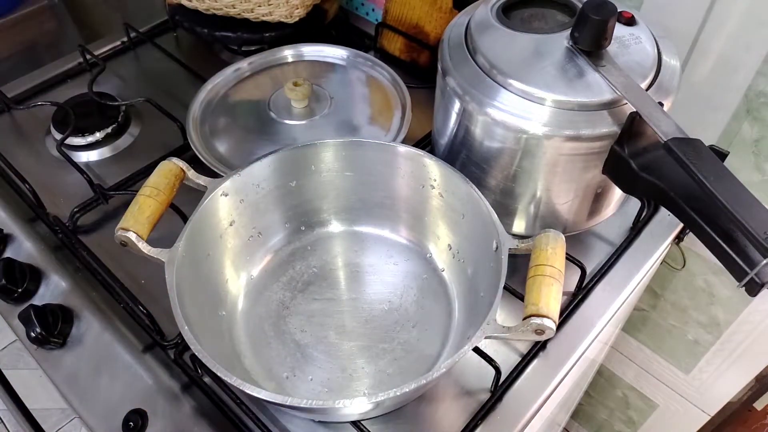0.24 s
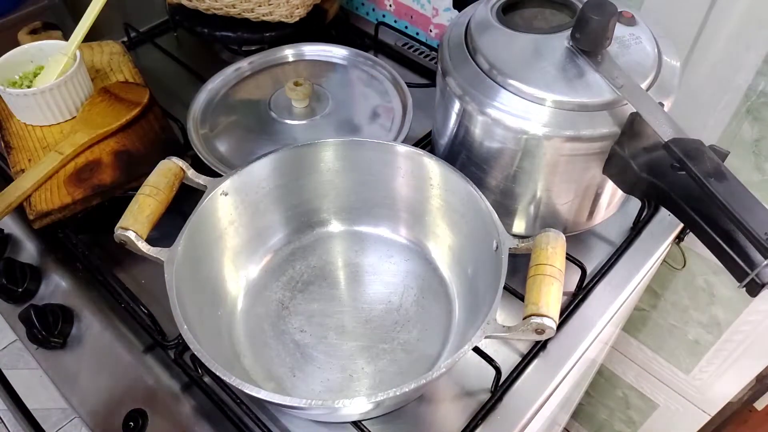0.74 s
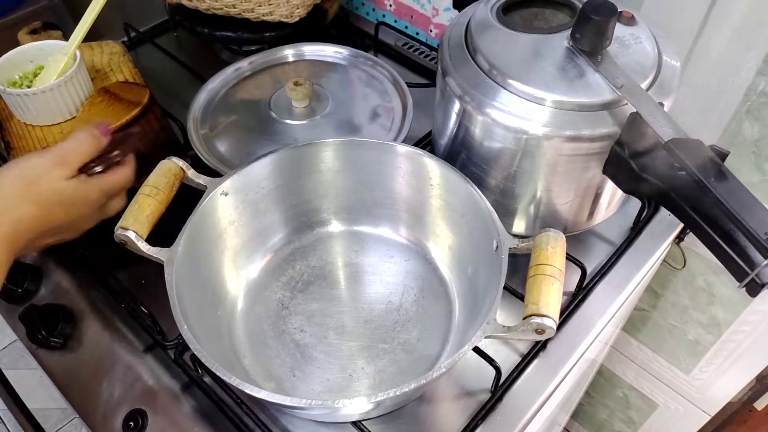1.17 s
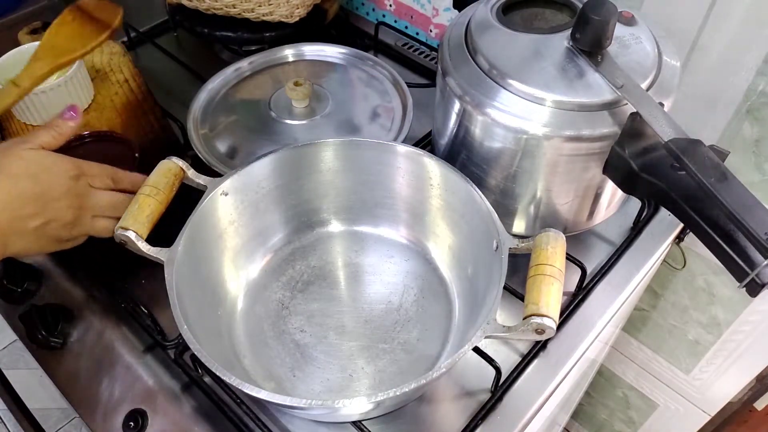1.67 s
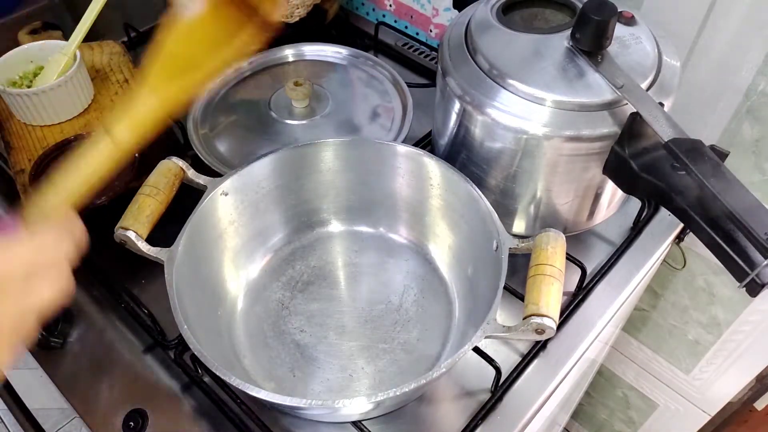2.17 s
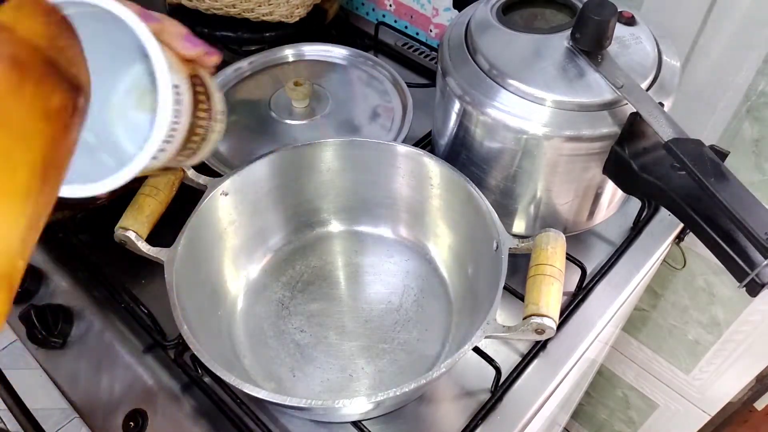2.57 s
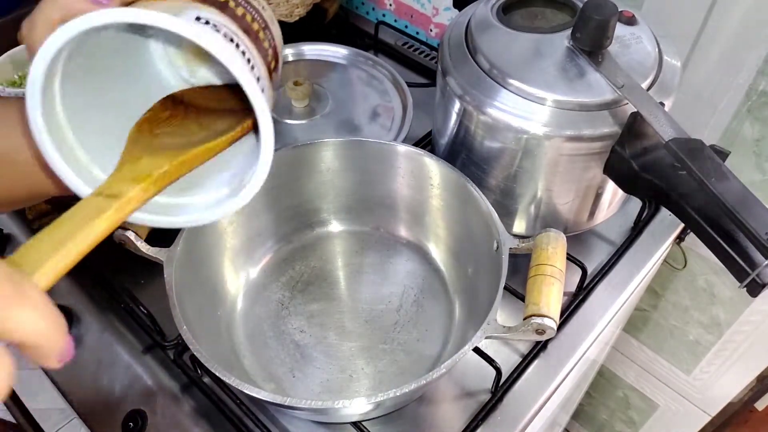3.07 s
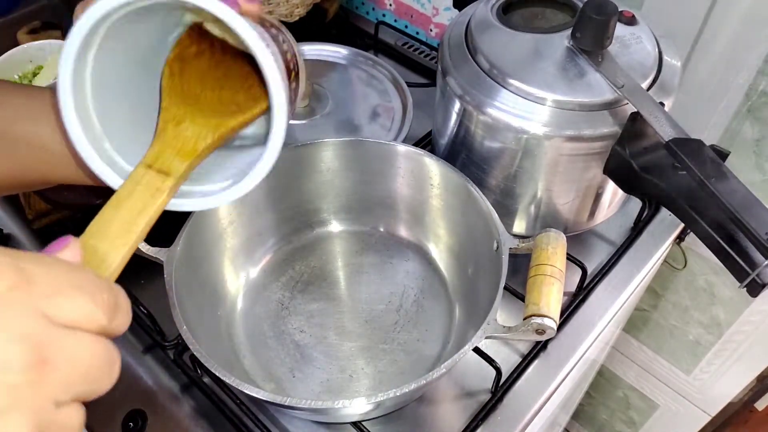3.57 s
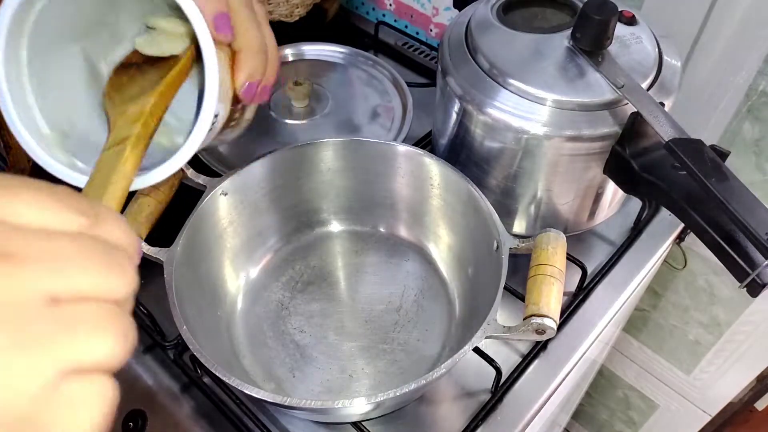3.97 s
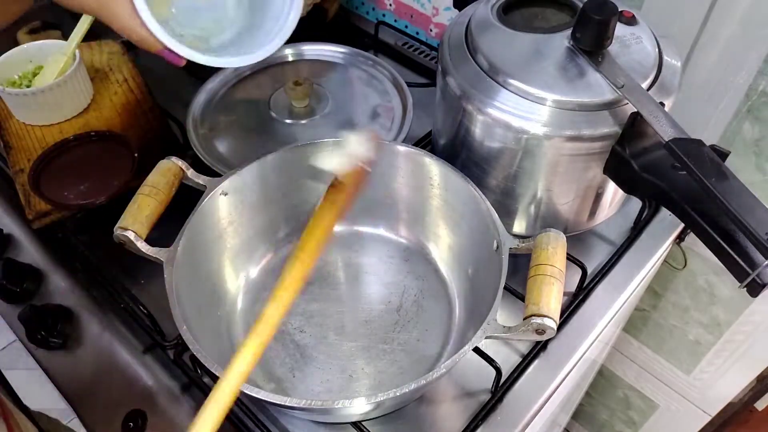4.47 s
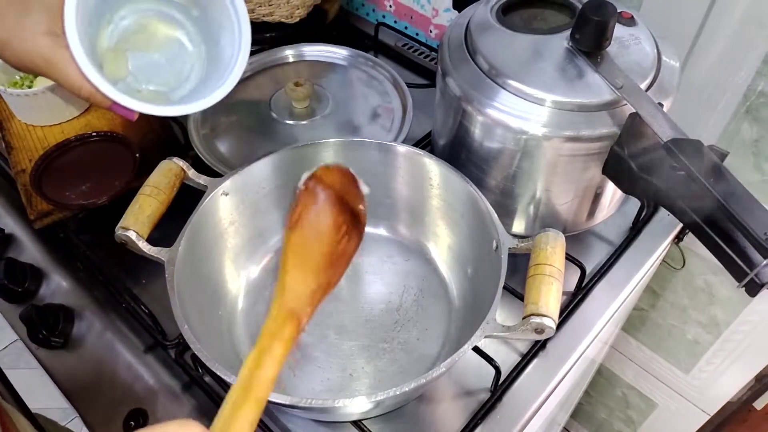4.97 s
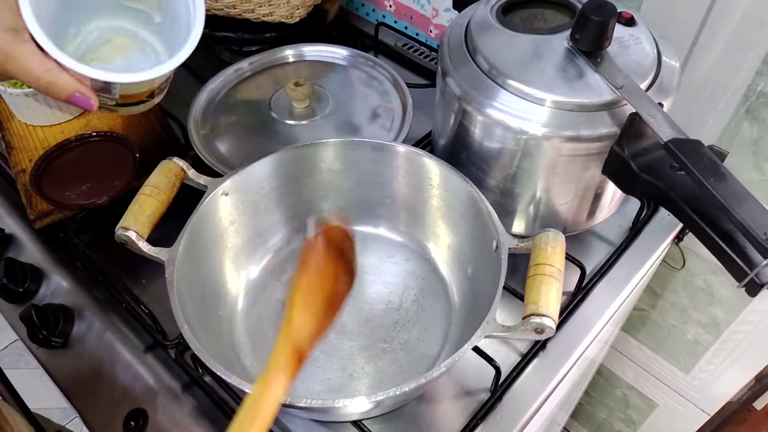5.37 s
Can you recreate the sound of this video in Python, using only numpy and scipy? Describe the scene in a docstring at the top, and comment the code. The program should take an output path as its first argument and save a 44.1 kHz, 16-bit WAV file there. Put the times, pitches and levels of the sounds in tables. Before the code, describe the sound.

From 0 to 0.6 s a pressure cooker vents close by: loud, bright, sputtering steam with breathy half-whistles. It cuts abruptly to complete silence until about 0.92 s. The steam then returns much softer and farther off, continuing to the end at 5.7 s, gently wavering, with thin airy whistles and small spurts after 4.3 s. A light wooden bump marks the return; more contacts chatter on a board around 1.45-2.0 s, strongest near 1.6, with a brief dish clink at 1.8. A wooden spoon knocks hollowly in a plastic tub from 2.9 to 3.2 s, with a rough rub, then again near 3.5 and duller at 3.75-3.8, with soft low handling rumble. A quick scrape and cluster of small knocks comes at 4.3-4.4 s. The small hard kitchen answers the knocks briefly; low hum lies underneath, with a faint gliding drone between about 0.9 and 4.2 s.

```python
"""A pressure cooker vents steam close by (filtered, sputtering noise with half-whistles); 0.3 s of silence, and
the scene changes. Then it vents farther off, while things are shifted on a wooden board (struck modes) and a
dish clinks. A wooden spoon knocks and rubs in a plastic tub as it scoops out a dollop (decaying rings, rough
noise). A small hard-walled kitchen answers the knocks; a low hum lies under both parts, and a faint gliding
drone comes and goes under the second."""
import sys
import numpy as np
from scipy import signal
from scipy.fft import rfft, irfft, next_fast_len
from scipy.io import wavfile
from scipy.ndimage import uniform_filter1d, minimum_filter1d, map_coordinates

SR = 44100
rng = np.random.default_rng(int(sys.argv[2]) if len(sys.argv) > 2 else 0)


def materialize(psi):
    """Save the field psi as 16-bit PCM at rate SR to the path in sys.argv[1].

    A 1-D psi becomes a single channel; in a 2-D psi each row is a channel.
    """
    bounded = np.clip(np.atleast_2d(psi).T, -1, 1)
    quanta = np.round(bounded * 32767).astype(np.int16)
    wavfile.write(sys.argv[1], SR, quanta)


N = 248265

LEFT_RIGHT = np.array([[1], [-1]])


def amp(db):
    """Decibels to gain."""
    return 10 ** (np.asarray(db) / 20)


def pan(left_minus_right_db):
    """Level offsets in dB of the two sides, half the difference each."""
    return left_minus_right_db * LEFT_RIGHT / 2


def unit(x):
    """Scale to rms 1."""
    return x / np.sqrt(np.mean(x ** 2) + 1e-20)


def steady(x):
    """Hold a noise at rms 1 from moment to moment."""
    power = np.abs(uniform_filter1d(np.mean(x ** 2, axis=0), size=4000))
    return x / np.sqrt(power + 1e-20)


def clock():
    """Time of each sample, s."""
    return np.arange(N) / SR


def along(points, hz):
    """Read (Hz, value) points on a log frequency axis."""
    f, v = np.transpose(points)
    return np.interp(np.log(hz + 1), np.log(f + 1), v)


def wobble(knots_per_s):
    """Smooth random curve through normal knots."""
    knots = rng.standard_normal(int(N * knots_per_s / SR) + 4)
    return map_coordinates(knots, [clock() * knots_per_s])


def arch(start_s, end_s):
    """Swell from nothing at start and fade to nothing at end."""
    progress = np.clip((clock() - start_s) / (end_s - start_s), 0, 1)
    return np.sqrt(np.abs(np.sin(np.pi * progress)))


def struck(age_s, t60_s):
    """Quick rise at age 0, then exponential decay."""
    t = np.maximum(age_s, 0)
    return (1 - np.exp(-t / 0.001)) * amp(-60 * t / t60_s)


def filtered(x, response):
    """Multiply the spectrum of x by a response of frequency."""
    m = next_fast_len(N + 8192)
    return irfft(rfft(x, m) * response(np.fft.rfftfreq(m, 1 / SR)), m)[..., :N]


def left_late(hz, delay_s):
    """Response of the two sides to a sound that reaches the left one later."""
    return np.exp(-2j * np.pi * hz * np.array([[delay_s], [0]]))


def pair(alike):
    """White stereo noise whose sides have the correlation alike."""
    mid, side = rng.standard_normal((2, N))
    turn = np.arccos(np.clip(alike, -1, 1)) / 2
    return np.cos(turn) * mid + np.sin(turn) * side * LEFT_RIGHT


def rippled(x, depth_db, width_hz, life_s, own):
    """Random peaks and troughs drift through the spectrum; own weights what differs between the sides."""
    hz, t, z = signal.stft(x, SR, nperseg=1536, noverlap=1152)
    grid = np.meshgrid(hz / width_hz, t / life_s, indexing="ij")
    shared, left, right = [unit(map_coordinates(knots, grid, order=1, mode="mirror"))
                           for knots in rng.standard_normal((3, 512, 256))]
    field = unit(shared + own * np.array([left, right]))
    field = np.minimum(field, 2.2)  # limit the highest peaks
    return signal.istft(z * amp(depth_db * field), SR, nperseg=1536, noverlap=1152)[1][:, :N]


def wash(centre_hz, octaves):
    """Rms-1 noise band, a resonance blurred by the room; the lower, the more alike the sides."""
    alike = along([(200, 1.0), (600, 0.55), (1000, 0.13)], centre_hz)
    return unit(filtered(pair(alike), lambda hz: 1 / (1 + (np.log2((hz + 1) / centre_hz) / octaves) ** 4)))


def part(index):
    """Gate of one part: 1 while it sounds, with a 1 ms start and a very quick fade."""
    # parts: start/s, end/s
    spans = [(-.01, .601), (.922, 5.7)]
    start_s, end_s = spans[index]
    fade_t60_s = 0.03
    return np.clip((clock() - start_s) * 1000, 0, 1) * amp(-60 * np.maximum(clock() - end_s, 0) / fade_t60_s)


def background():
    """Low room noise with a hum, a narrow noise band that wavers by itself."""
    # room noise spectrum: f/Hz, relative density/dB per Hz
    colour = [(12, -57.5), (20, -13.5), (70, -2.5), (98, -9.5), (124, 2), (157, -5.5), (183, -8),
              (206, -13.5), (247, -1), (370, -13), (562, -12.5), (622, -17.5), (1100, -12), (1430, -55),
              (2420, -120)]
    floor_db, hum_db = -60.5, -68
    floor = unit(filtered(pair(0.79), lambda hz: amp(along(colour, hz))))
    hum = unit(filtered(pair(1.0), lambda hz: 1 / (1 + ((hz - 129) / 7) ** 2)))
    return amp(floor_db) * floor + amp(hum_db) * hum


def drone():
    """Faint, unsteady tone and its octave slide in pitch, perhaps an engine outside."""
    # glides: start/s, end/s, first f/Hz, last f/Hz, fundamental/dB, octave/dB
    glides = [(0.92, 1.068, 108.8, 114.6, -66, -53), (1.06, 1.288, 123.1, 127.6, -62, -50),
              (1.634, 1.835, 136.3, 126, -47, -54), (1.948, 2.173, 121.5, 115.5, -51, -66),
              (3.078, 3.9, 133.4, 98.2, -51, -62), (3.99, 4.223, 93.5, 84.2, -58, -54)]
    waver_db, jitter_hz = 2, 2.5
    out = np.zeros(N)
    for start_s, end_s, first_hz, last_hz, low_db, octave_db in glides:
        hz = np.interp(clock(), [start_s, end_s], [first_hz, last_hz]) + jitter_hz * wobble(45)
        phase = 2 * np.pi * np.cumsum(hz) / SR
        for k, db in enumerate([low_db, octave_db]):
            level = amp(db + waver_db * wobble(24.82))
            out += arch(start_s, end_s) * level * np.sin((k + 1) * phase)
    return out


def kitchen(x, alike=0.073, build_s=0.0025):
    """Room answer: noise builds up after the first wall echo and dies, slowest in the bass."""
    # reverberation: f/Hz, t60/s
    reverb = [(120, 0.86), (300, 0.33), (700, 0.35), (2000, 0.12), (10000, 0.43)]
    wall_delay_s = 0.009
    hz, t, z = signal.stft(pair(alike)[:, :SR * 3 // 4], SR, nperseg=256)
    build = 1 - np.exp(-np.maximum(t - wall_delay_s, 0) / build_s)
    decay = amp(-60 * t / along(reverb, hz)[:, None]) * build
    tail = signal.istft(z * decay, SR, nperseg=256)[1]
    wet = signal.fftconvolve(x[None], tail / np.linalg.norm(tail[0]), axes=1)
    # long waves reach both sides alike
    highpass = signal.butter(2, 330, "highpass", fs=SR, output="sos")
    side = signal.sosfilt(highpass, (wet[0] - wet[1]) / 2)
    return wet.mean(axis=0) + side * LEFT_RIGHT


def rumble():
    """The hand turning the tub adds a soft, low noise band."""
    # turns: start/s, end/s, level/dB
    turns = [(3.694, 3.91, -50.5), (4.028, 4.26, -57.5)]
    level = sum(amp(db) * arch(start_s, end_s) ** 2 for start_s, end_s, db in turns)
    return level * wash(centre_hz=100, octaves=0.49)


def clink():
    """A dish is touched: one short, light ring with a weaker low mode."""
    start_s, t60_s, level_db = 1.808, 0.23, -41.5
    modes = wash(centre_hz=1940, octaves=0.047) + 0.6 * wash(centre_hz=1140, octaves=0.07)
    return amp(level_db) * struck(clock() - start_s, t60_s) * modes


def bumps():
    """Things chatter on the board: each contact rings the modes near its pitch, its weight the lowest."""
    # contacts: t/s, level/dB, pitch/Hz, weight (drive of the lowest mode)/dB, left minus right/dB
    contacts = [(0.922, -38, 510, 1.5, 2), (0.942, -59, 430, 6, 2), (1.456, -48.5, 635, -40, -2),
                (1.603, -44, 640, -12, 1), (1.618, -32.5, 1200, -12, 3), (1.637, -43, 900, -2, 1),
                (1.649, -44, 775, 0, 0), (1.683, -50, 800, 4, 3), (1.777, -62, 700, 18, 1),
                (1.807, -45.5, 570, -13, -1), (1.865, -48.5, 543, -1, 1), (2.021, -55, 810, -4, 3),
                (2.604, -52.5, 555, -14, 6), (4.1, -72, 500, 22.5, 4)]
    # board modes, lowest first: f/Hz, level/dB, blur/octaves, t60/s
    modes = [(223, -9, 0.32, 0.51), (370, 0.5, 0.23, 0.27), (540, -1.5, 0.22, 0.32), (800, -1, 0.41, 0.43),
             (1200, -0.5, 0.3, 0.24)]
    reach_octaves = 0.42  # how far from its pitch a contact still wakes modes
    direct_db, direct_cycles = 3, 13  # clean ring ahead of the room's wash; its t60 in cycles
    chatter_db = 1
    out, t = np.zeros((2, N)), np.arange(SR * 3 // 4) / SR
    for k, (hz, mode_db, octaves, t60_s) in enumerate(modes):
        blur = wash(hz, octaves)
        for s, db, pitch_hz, weight_db, pan_db in contacts:
            span = slice(round(s * SR), round(s * SR) + len(t))
            if k == 0:
                drive = amp(weight_db)
            else:
                drive = 1 / (1 + (np.log2(hz / pitch_hz) / reach_octaves) ** 4)
            detuned_hz = hz * (1 + 0.056 * rng.standard_normal())
            clean = np.sin(2 * np.pi * detuned_hz * t) * struck(t, direct_cycles / hz)
            ring = amp(direct_db) * clean + struck(t, t60_s) * blur[:, span]
            out[:, span] += amp(db + mode_db + pan(pan_db)) * drive * ring
    return out * amp(chatter_db * wobble(110))


def scrapes():
    """The rubbing spoon sticks and slips: rough noise coloured by the tub's hollow."""
    # strokes: start/s, end/s, level/dB
    strokes = [(2.897, 3.104, -48), (4.28, 4.342, -47), (4.345, 4.43, -52)]
    level = sum(amp(db) * arch(start_s, end_s) ** 2 for start_s, end_s, db in strokes)
    return level * amp(4.5 * wobble(140)) * wash(centre_hz=620, octaves=0.45)


def tub():
    """Each knock rings hollow and wall, thumps the base and ticks; each has its own freshly drawn room tail."""
    # spoon knocks: t/s, level/dB, ring f/Hz, ring t60/s, thump/dB, tick/dB, tick f/Hz
    knocks = [(2.925, -27.5, 680, .05, -9, -19, 1700), (2.973, -10, 643, 0.015, -29, -14, 1770),
              (2.979, -25.5, 740, 0.023, -20, -2, 1650), (2.993, -30, 480, 0.026, -17, -14, 1500),
              (3.016, -22.5, 600, 0.018, -25, -18, 1400), (3.056, -16, 743, 0.026, -35, -24, 1300),
              (3.197, -10, 706, 0.023, -10.5, -21.5, 1250), (3.493, -29, 726, 0.045, -29, -27, 1500),
              (3.536, -13.5, 685, 0.035, -16, -10, 1610), (3.754, -18.5, 535, 0.0085, -6.5, -23, 1310),
              (3.787, -18, 584, 0.012, -14.5, -24, 1500), (4.3, -32, 646, 0.031, -23, -28, 1500),
              (4.306, -33, 784, .03, -23, -28, 1500), (4.318, -30, 750, 0.027, -25, -30, 1500),
              (4.322, -21.5, 650, .024, -26, -26, 1500), (4.33, -32, 563, 0.017, -17, -22, 1500),
              (4.358, -39, 560, .03, -20, -24, 1500), (4.375, -41, 780, .03, -20, -22, 1500)]
    # wall modes: f/Hz, mean level/dB, t60/s
    wall_modes = [(400, -28, 0.037), (513, -14.5, 0.044), (842, -21, 0.055)]
    # wall tick: multiple of tick f, level/dB, t60/s
    tick_modes = [(.83, -11, 0.013), (1, 0.5, 0.02), (1.14, 0, .014), (1.9, 4, 0.013)]
    # room answer: left/dB, right/dB
    room_db = [-3.5, -6]
    direct, room, t = np.zeros(N + SR), np.zeros((2, N + 2 * SR)), np.arange(SR // 4) / SR
    woody = signal.butter(2, [700, 3600], "bandpass", fs=SR, output="sos")

    def ring(hz, t60_s, attack_s):
        return np.sin(2 * np.pi * hz * t) * amp(-60 * t / t60_s) * (1 - np.exp(-t / attack_s))

    for s, db, hz, t60_s, thump_db, tick_db, tick_hz in knocks:
        hollow = 1.4 * ring(hz, t60_s, attack_s=0.0014)
        wall = sum(amp(mode_db + 2 * rng.standard_normal()) * ring(mode_hz, mode_t60_s, attack_s=0.005)
                   for mode_hz, mode_db, mode_t60_s in wall_modes)
        thump = ring(hz=245, t60_s=0.035, attack_s=0.0064)
        thump += 0.45 * ring(hz=145, t60_s=0.088, attack_s=0.011)
        thump += 0.31 * ring(hz=478, t60_s=0.038, attack_s=0.0073)
        crack = signal.sosfilt(woody, rng.standard_normal(len(t)) * amp(-60 * t / 0.0018))
        tick = 1.2 * crack + sum(amp(mode_db) * ring(multiple * tick_hz, mode_t60_s, attack_s=0.00025)
                                 for multiple, mode_db, mode_t60_s in tick_modes)
        knock = amp(db) * (hollow + wall + amp(thump_db) * thump + amp(tick_db) * tick)
        answer = kitchen(knock)
        direct[round(s * SR):][:len(t)] += knock
        room[:, round(s * SR):][:, :answer.shape[1]] += answer
    sides = filtered(direct[:N], lambda hz: left_late(hz, delay_s=0.0002)) * amp([[-2], [0.5]])
    return sides + amp(room_db)[:, None] * room[:, :N]


def whistles():
    """The jet half-whistles at the valve: breathy resonances swell, glide and flicker, each panned."""
    # start/s, end/s, first f/Hz, last f/Hz, width/Hz, level/dB, left minus right/dB
    resonances = [(-.2, 0.797, 2710, 2710, 100, -40, -0.5), (-.2, 0.6, 7480, 7540, 350, -28.5, 0),
                  (-.15, .22, 6250, 6630, 450, -28.5, 5), (.12, 0.676, 10580, 12670, 1000, -21.5, 8),
                  (0.382, 0.639, 13730, 14730, 1200, -23, 12), (0.896, 1.116, 6210, 6230, 200, -44, 7.5),
                  (0.903, 1.143, 7350, 7100, 200, -43, 3), (0.898, 1.418, 11340, 10940, 443, -36.5, 7.5),
                  (1.285, 2.302, 13200, 12940, 450, -35.5, -5.5), (1.88, 2.05, 8450, 8600, 200, -36.5, 6),
                  (2.56, 2.945, 5510, 5450, 150, -44.5, 8), (2.372, 4.9, 8020, 8000, 190, -37.5, -4),
                  (2.547, 3.504, 10950, 11030, 300, -35.5, 7), (3.705, 5.102, 12460, 12640, 300, -47, 0),
                  (4.33, 4.92, 3560, 3530, 250, -43, 1.5), (5.05, 5.5, 3300, 3500, 400, -39, 0),
                  (4.45, 4.65, 2730, 2770, 120, -44, -4), (5.06, 5.16, 2860, 2860, 120, -42, 0),
                  (4.6, 5.4, 7200, 7240, 199, -42, -3), (4.92, 5.748, 6170, 6160, 250, -40.5, 7),
                  (4.88, 5.55, 13400, 13800, 600, -35.5, 10)]
    flicker_db, swell_db = 1.6, 2.2
    out = np.zeros((2, N))
    for start_s, end_s, first_hz, last_hz, width_hz, db, pan_db in resonances:
        on = (clock() > start_s) & (clock() < end_s)
        hz = np.interp(clock()[on], [start_s, end_s], [first_hz, last_hz])
        pole = np.exp(-np.pi * width_hz / SR)
        noise = pair(0.34)[:, on] + 1j * pair(0.21)[:, on]
        breath = signal.lfilter([1], np.poly([pole, pole]), noise)
        band = np.real(breath * np.exp(2j * np.pi * np.cumsum(hz) / SR))
        level_db = db + (flicker_db * wobble(35) + swell_db * wobble(9))[on] + pan(pan_db)
        out[:, on] += amp(level_db) * arch(start_s, end_s)[on] * unit(band)
    return out


def jet(rows, sway_db, spurt_db, roar_colour, fizz_colour, roar_level_db, roar_alike, fizz_alike, sputter_db):
    """Turbulent steam: a roar from the right and a bright fizz, sputtering as droplets pass the valve."""
    roar_follows, sizzle_follows = 0.082, 0.68  # shares of the fizz's dB swings
    fizz_offset_db = 1.0
    s, points_db = np.transpose(rows)
    mean_db = points_db.mean()
    strength_db = np.interp(clock(), s, points_db)
    swing_db = strength_db - mean_db + pan(sway_db)
    roar_db = roar_level_db + roar_follows * (strength_db - mean_db) + spurt_db + 0.57 * wobble(17)

    def low(hz):
        return 1 / np.sqrt(1 + (hz / 6900) ** 40)

    roar = filtered(pair(roar_alike),
                    lambda hz: amp(along(roar_colour, hz)) * low(hz) * left_late(hz, delay_s=0.0002))
    fizz = filtered(pair(fizz_alike), lambda hz: amp(along(fizz_colour, hz)) * np.sqrt(1 - low(hz) ** 2))
    # narrow random peaks and troughs drift through the hiss
    roar = rippled(roar, depth_db=4.0, width_hz=60, life_s=0.09, own=0.22)
    fizz = rippled(fizz, depth_db=3.6, width_hz=55, life_s=0.05, own=0.3)
    # broad patches wander between left and right
    fizz = rippled(fizz, depth_db=2.0, width_hz=270, life_s=0.11, own=3.7)
    sputter = sputter_db * (wobble(30) + 1.76 * wobble(130) + 1.3 * wobble(500))
    flutter = 0.35 * wobble(11)  # the valve weight rocks, dB
    fizz = steady(fizz) * amp(mean_db + fizz_offset_db + flutter + sputter)
    # the lower fizz is less narrowly beamed
    sizzle = filtered(fizz, lambda hz: 1 / (1 + (hz / 9800) ** 20))
    roar = steady(roar) * amp(roar_db + 0.25 * sputter)
    return roar + sizzle * amp(sizzle_follows * swing_db) + (fizz - sizzle) * amp(swing_db)


def scene():
    """The cooker close up; after 0.3 s of silence the scene changes to the cooker behind the work at the tub."""
    # jet strength, close and farther off: t/s, level/dB
    near_strength = [(0.0, -16), (0.532, -15), (0.6, -18)]
    far_strength = [(0.93, -31), (1.06, -29), (1.14, -33), (1.35, -29.5), (1.44, -30.5), (1.65, -29.5),
                    (1.74, -30), (1.96, -28), (2.05, -30), (2.25, -28), (2.41, -29), (2.48, -26.5),
                    (2.6, -29.5), (3.3, -29), (3.97, -26), (4.21, -30.5), (4.38, -24.5), (4.44, -27),
                    (4.91, -26), (4.99, -22.5), (5.14, -29), (5.44, -25), (5.62, -28.5)]
    # roar and fizz spectra, close and farther off: f/Hz, relative density/dB per Hz
    near_roar = [(200, -41.5), (800, -32.5), (1150, -24.5), (1400, -17), (2000, -10.5), (2350, -12.5),
                 (2700, -1.5), (3100, -4.5), (3600, 1), (4200, -6.5), (5000, -16.5), (5500, -7), (6100, -8),
                 (7000, -2.5)]
    far_roar = [(200, -58), (600, -25), (1050, -22), (1500, -13.5), (2050, -15.5), (2400, -3), (2800, -2.5),
                (3150, -3.5), (3600, -0.5), (4150, -5.5), (5000, -9.5), (5500, -6), (6600, -1.5),
                (7200, -26)]
    near_fizz = [(6000, -10.5), (7000, -6), (7600, -5.5), (8600, -6.5), (9800, -4), (11000, -3),
                 (11800, -0.5), (12700, -1), (13700, -6), (15700, -8)]
    far_fizz = [(6000, -16), (7100, -4), (7900, -5.5), (8600, -6), (9500, -8), (10200, -3.5), (11000, 0),
                (12000, -1), (12800, -0.5), (13800, -5), (15000, -8), (15700, -8.5)]
    # wander of the farther fizz between the sides: t/s, left minus right/dB
    sway = [(0.93, -3), (1.05, 9), (1.16, -1), (1.26, 2), (1.52, -6), (2.8, 5), (3.14, -0.5), (3.36, 6),
            (3.48, -1.5), (3.74, -2), (3.83, 2), (3.94, -4.0), (4.31, 1), (4.39, -4), (4.46, -1),
            (5.62, -1)]
    # spurts that lift the farther roar: t/s, lift/dB
    spurts = [(4.37, 3), (4.59, 2), (4.83, 1), (5.11, 0.5), (5.39, 3.5)]
    spurt_width_s = 0.035  # from the peak to 1/e
    near = jet(near_strength, 2, 0, near_roar, near_fizz,
               roar_level_db=-22.5, roar_alike=0.51, fizz_alike=0.42, sputter_db=0.5)
    sway_db = np.interp(clock(), *np.transpose(sway))
    spurt_db = sum(db * np.exp(-((clock() - s) / spurt_width_s) ** 2) for s, db in spurts)
    far = jet(far_strength, sway_db, spurt_db, far_roar, far_fizz,
              roar_level_db=-36.5, roar_alike=0.68, fizz_alike=0.83, sputter_db=0.5)
    work = tub() + scrapes() + rumble() + bumps() + clink()
    throughout = whistles() + background()
    return part(index=0) * (near + throughout) + part(index=1) * (far + work + drone() + throughout)


def record(dry):
    """A fast limiter holds peaks under full scale; a steep low-pass removes the top."""
    top_hz = 15850
    needed = np.minimum(1, 0.92 / (np.abs(dry).max(axis=0) + 1e-9))
    gain = uniform_filter1d(minimum_filter1d(needed, size=89), size=89)
    return filtered(dry * gain, lambda hz: 0.5 - 0.5 * np.tanh((hz - top_hz) / 60))


dry = scene()
out = record(dry)
materialize(out)
```